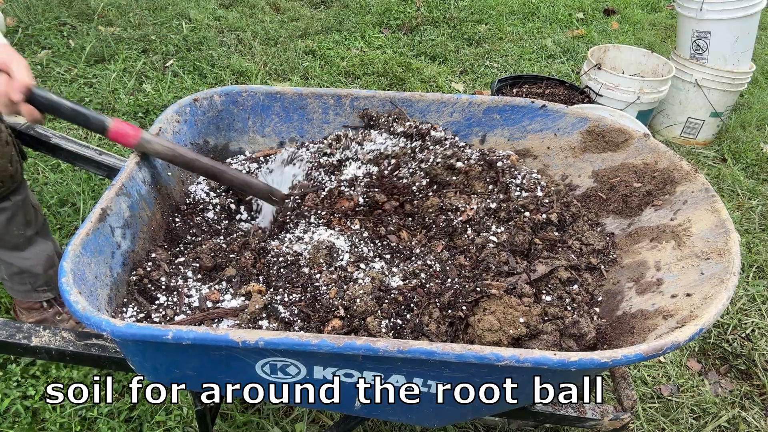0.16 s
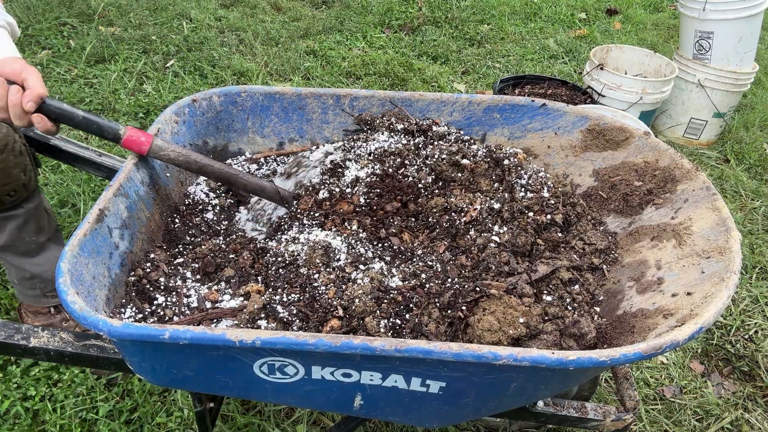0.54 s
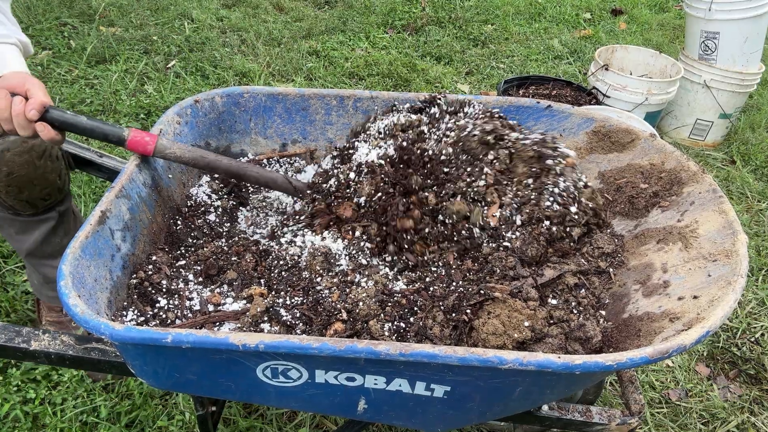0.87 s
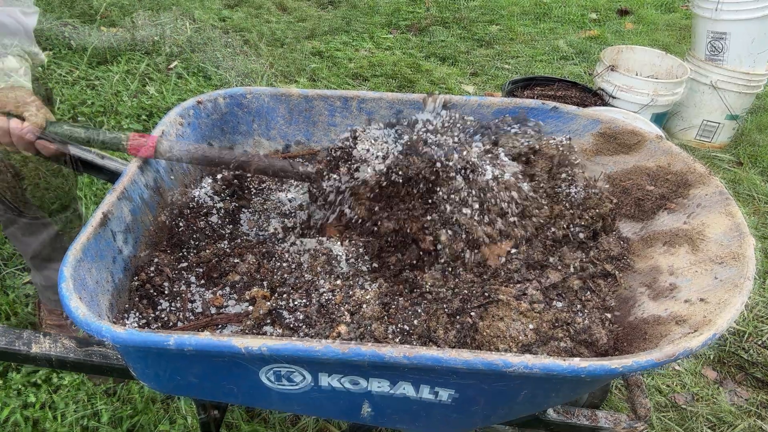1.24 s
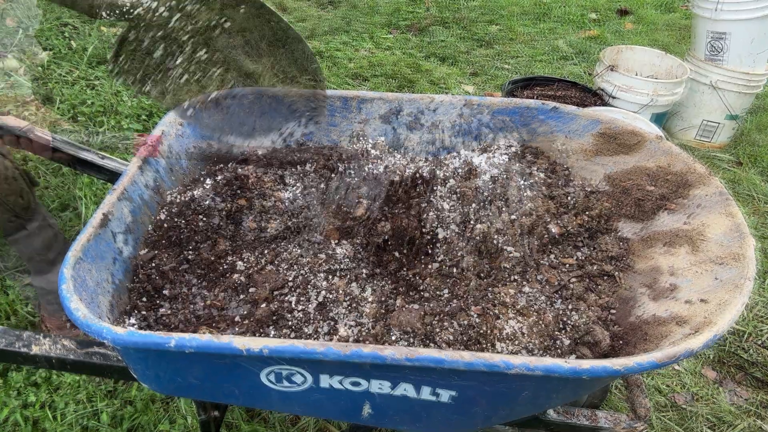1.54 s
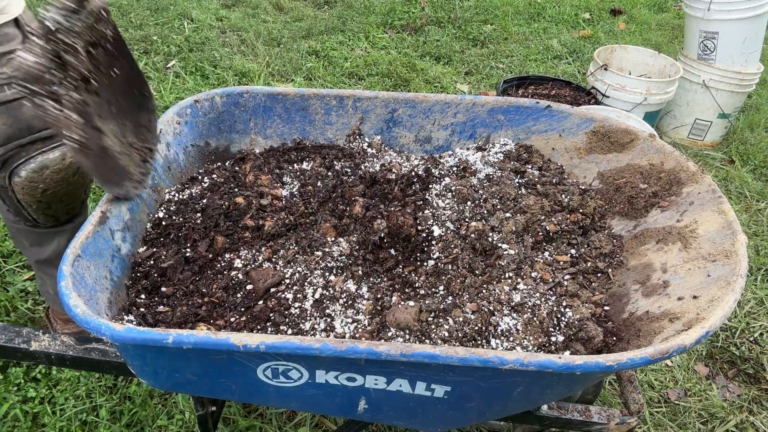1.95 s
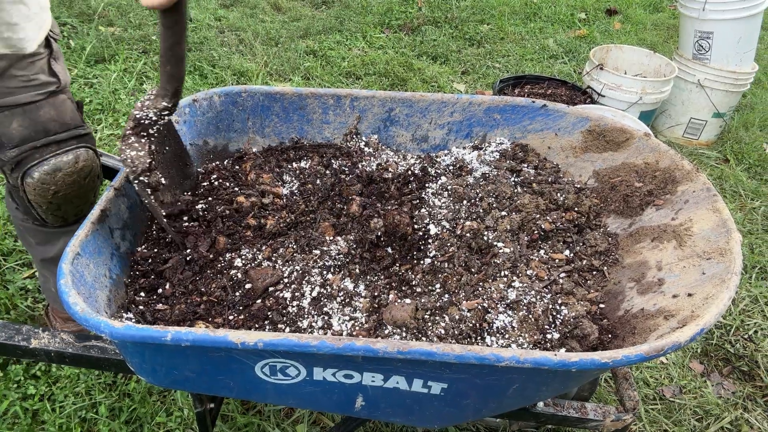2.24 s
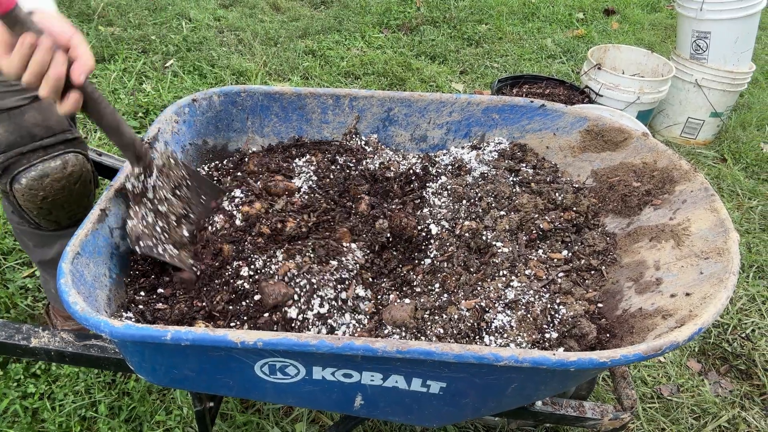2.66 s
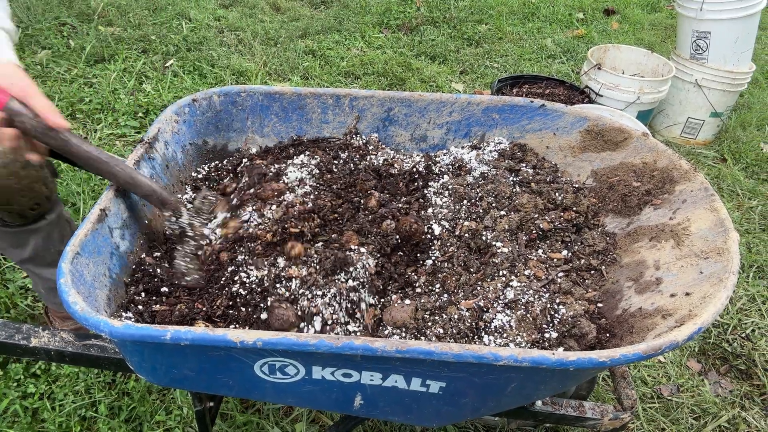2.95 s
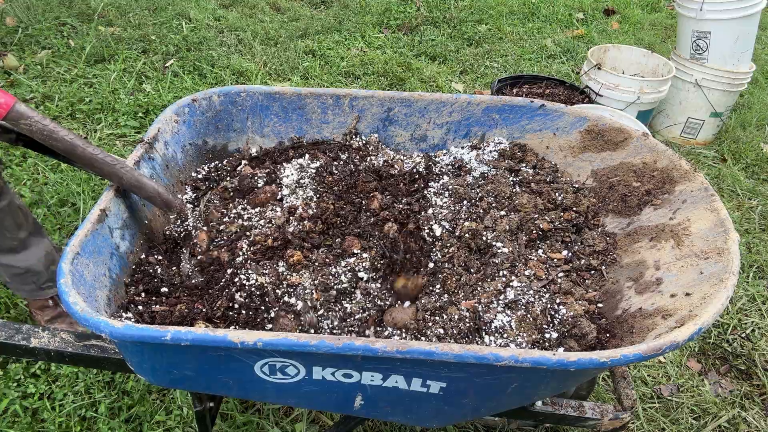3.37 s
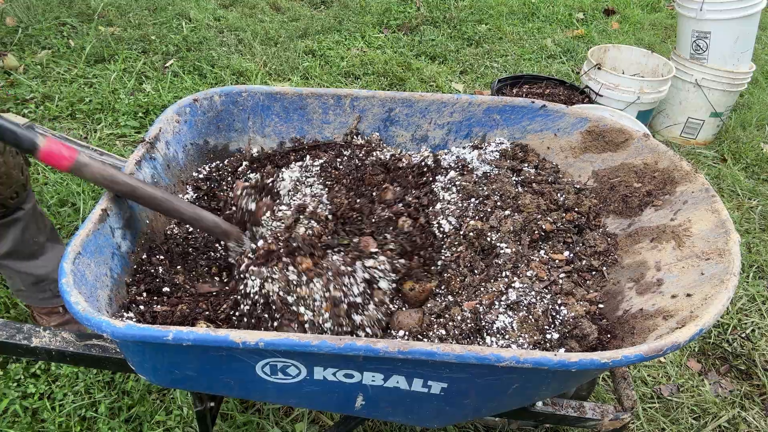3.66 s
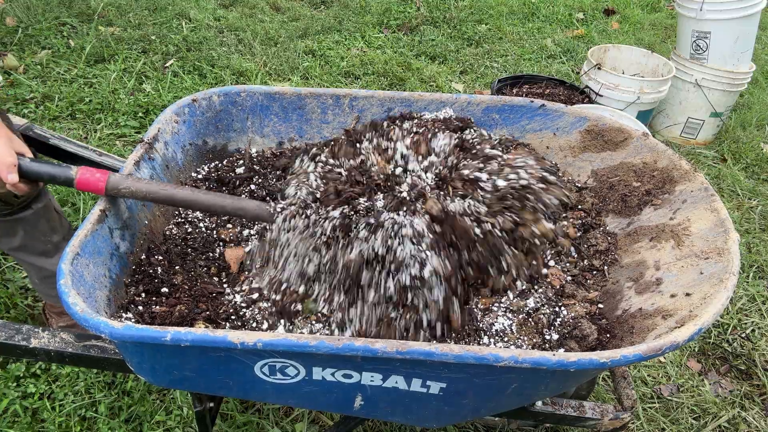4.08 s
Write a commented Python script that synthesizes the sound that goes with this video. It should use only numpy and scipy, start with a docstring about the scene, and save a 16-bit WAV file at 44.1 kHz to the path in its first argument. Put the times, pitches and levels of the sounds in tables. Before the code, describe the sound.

Very close outdoors, a shovel blade grinds loudly through gritty soil with clustered knocks and a low wheelbarrow boom. Loose mix slides and patters softly, then after a near pause a bright metallic clink sounds. Short, quieter scrapes and knocks follow, then a strong burst of stony hits around three and a half seconds, and soil spills again. Faint rumble, air and insects sit behind in stereo.

```python
"""A garden, outdoors: a steel shovel turns a gritty soil mix in a wheelbarrow, close to a two-port microphone.
In short pushes the blade grinds through grit as shaped noisy impacts; the tub booms as decaying low sines.
Lumps knock and hard grains clink as short bursts of cracks that ring the steel.
Lifted soil slides off and patters down as swarms of tiny impacts.
Behind lie a low outdoor rumble, diffuse air and a faint band of insects, all filtered noise."""
import sys
import numpy as np
from scipy import signal
from scipy.fft import rfft, irfft, next_fast_len
from scipy.io import wavfile
from scipy.ndimage import uniform_filter1d, map_coordinates

SR = 44100
rng = np.random.default_rng(int(sys.argv[2]) if len(sys.argv) > 2 else 0)


def store_wav(level_fs):
    """Save 16-bit WAV to argv[1]."""
    pcm = np.round(np.clip(np.atleast_2d(level_fs), -1, 1) * 32767)
    wavfile.write(sys.argv[1], SR, pcm.T.astype(np.int16))


N = 185837

# modes of the soil-damped blade: (frequency [Hz], width [Hz], lift [dB])
BLADE_MODES = [(542, 33, 6.5), (1011, 31, 3.5), (1260, 85, 2), (1470, 19, 1.5), (1670, 22, -1.5),
               (2170, 37, 3.5), (2427, 64, 4.5), (3150, 66, 1.5), (3820, 69, 8.5), (4400, 20, -3),
               (4735, 110, 5.5), (5230, 65, 4.5), (6470, 49, 6.5)]
# colour of coarse scraping and of knocks: (frequency [Hz], relative level [dB])
GRIND_COLOUR = [(60, -27.5), (200, 5.5), (420, 1), (530, -0.5), (650, 0), (900, 0.5), (1250, -0.5),
                (1600, -2), (2100, -5), (2600, -13), (4200, -12.5), (6000, -23.5), (9000, -81)]
# colour of fine grit and of clinks: (frequency [Hz], relative level [dB])
GRIT_COLOUR = [(400, -66), (1800, -6.5), (3100, -3), (3900, -3.7), (4600, 0.5), (6200, 3), (8000, -2),
               (10000, -4.5), (12500, 0), (15500, -6.5)]


def scrape():
    """The blade sticks and slips through the mix; each push drives tub, steel and grit together."""
    # pushes of the blade: (start [s], end [s], tub drone [dB], blade grind [dB], grit [dB],
    # loss of force from start to end [dB], resonance under the blade [Hz])
    strokes = [(0, 0.071, -25, -15.5, -24.5, 3.5, 520), (.085, 0.196, -17, -23, -27, 0, 465),
               (0.196, 0.233, -18.5, -23, -26, 3, 472), (2.088, 2.11, -35, -36.5, -33, -2.5, 1715),
               (2.359, 2.405, -32, -41, -38, 9, 1690), (2.431, 2.494, -39, -29, -28, 0, 1800),
               (2.509, 2.673, -29.5, -31, -32.5, 4.5, 1570), (2.679, 2.79, -27.5, -29.5, -33, -0.5, 2040),
               (2.824, 2.879, -27.5, -27, -28, 2.5, 2060), (2.896, 2.986, -30, -28.5, -37.5, 1.5, 1630),
               (3.484, 3.608, -33, -29.5, -40, -2, 1080), (3.61, 3.738, -33.5, -26, -38, -2.5, 1200),
               (3.762, 3.861, -30.5, -31.5, -39, 3, 1480)]
    # colour of the droning tub: (frequency [Hz], relative level [dB])
    drone_colour = [(60, -31), (110, -19.5), (150, -6), (190, -1.5), (270, -12), (380, -21.5), (600, -29.5),
                    (1500, -74)]
    start, end, drone_db, grind_db, grit_db, loss_db, gap_hz = np.transpose(strokes)
    pushes = np.array([gesture(a, b, rise=0.049, fall=0.04, loss_db=loss)
                       for a, b, loss in zip(start, end, loss_db)])
    # the resonance glides from the middle of one push to the next
    hollow_hz = np.interp(np.arange(N) / SR, (start + end) / 2, gap_hz)
    slip = wobble(130)

    coarse = grains(ring(GRIND_COLOUR, BLADE_MODES), rate=1100, spread_db=2.0, bed_db=-1.5)
    fine = grains(ring(GRIT_COLOUR, BLADE_MODES), rate=1300, spread_db=2, bed_db=-1.0)
    hum = grains(ring(drone_colour), rate=400, spread_db=2.5, bed_db=-6.0)

    drone = strongest(pushes, drone_db) * hum
    coarse = shifting(coarse, patchy_db=2.0, centre_hz=hollow_hz, lift_db=4)
    grind = strongest(pushes, grind_db) * amp(0.52 * slip) * coarse
    flicker = amp(0.59 * slip + 0.9 * wobble(300))
    grit = strongest(pushes, grit_db) * flicker * shifting(fine, patchy_db=1.6)
    return drone + grind + grit


def blows():
    """Single hard contacts of the blade, and the tub's answer."""
    # the blade hits lumps, bark or the tub wall:
    # (time [s], peak ahead of the ports [dB], lump's resonance [Hz], burst's t60 [s])
    knock_rows = [(.003, -2.5, 500, 0.031), (.015, -4.5, 520, 0.13), (.029, -6.5, 616, .035),
                  (.048, -7.5, 456, 0.04), (.071, -10, 458, 0.025), (.13, -11.5, 450, 0.039),
                  (.175, -7.5, 1700, 0.039), (.188, -10.5, 1530, .086), (1.127, -23, 597, 0.041),
                  (1.248, -23.5, 1975, 0.059), (1.963, -15.5, 1450, 0.098), (2.349, -27.5, 695, 0.027),
                  (2.416, -12, 2230, 0.054), (2.458, -15, 1520, 0.12), (2.568, -17.5, 456, 0.056),
                  (2.689, -11, 2060, 0.024), (2.82, -15, 1960, 0.059), (2.891, -15.5, 457, 0.055),
                  (3.08, -14.5, 1450, 0.014), (3.086, -17, 840, 0.058), (3.104, -18.5, 1560, .025),
                  (3.129, -19, 1070, 0.065), (3.451, -10, 1370, 0.022), (3.485, -18, 1050, 0.033),
                  (3.512, -16, 1000, 0.065), (3.556, -5, 1180, 0.045), (3.564, -5.5, 1240, 0.053),
                  (3.589, -10, 850, 0.032), (3.661, 2.5, 890, 0.014), (3.68, -3, 740, 0.045),
                  (3.7045, -3, 1200, 0.04), (3.745, -12.5, 656, 0.07), (3.799, -17, 1560, .03),
                  (3.838, -18, 660, 0.027), (3.967, -27.5, 910, 0.037), (4.156, -18.5, 1630, 0.079)]
    # hard grit cracks against the steel:
    # (time [s], peak ahead of the ports [dB], grain's resonance [Hz], burst's t60 [s])
    clink_rows = [(.041, -3.5, 10400, 0.089), (.094, -11, 14100, .024), (.174, -5, 3300, 0.075),
                  (1.17, -23.5, 13900, .018), (1.246, -20.5, 14200, .023), (1.309, -26, 14000, .015),
                  (1.9615, -4.5, 9000, 0.024), (2.085, -8.5, 5550, 0.0079), (2.124, -25, 14000, .009),
                  (2.415, -10, 4700, .035), (2.457, -10, 12400, .054), (2.689, -15, 4420, .016),
                  (2.829, -14.5, 10690, .06), (3.08, -26, 3550, 0.072), (3.103, -18, 12300, 0.041),
                  (3.129, -17, 6100, 0.019), (3.148, -16.5, 3850, .012), (3.383, -21, 12000, 0.0077),
                  (3.45, -15.5, 11900, 0.019), (3.518, -15.5, 13700, 0.046), (3.539, -10.5, 8950, 0.046),
                  (3.586, -16, 12690, .029), (3.659, -11.5, 3800, 0.034), (3.679, -11.5, 3830, 0.13),
                  (4.129, -19.5, 14400, 0.023), (4.157, -14.5, 4670, 0.015), (4.182, -10.5, 7700, 0.0036)]
    # breadth: width of the resonance as a share of its frequency
    knocks = contacts(knock_rows, GRIND_COLOUR, lift_db=9.5, breadth=0.6, swell_db=-19.5,
                      crumble_db=-34, crumble_t60=0.037, spiky_db=4.5)
    clinks = contacts(clink_rows, GRIT_COLOUR, lift_db=10, breadth=0.4, swell_db=-28.5,
                      crumble_db=-31.5, crumble_t60=0.34, spiky_db=10)
    return knocks + clinks + booms(attack=0.0068)


def contacts(rows, colour, lift_db, breadth, swell_db, crumble_db, crumble_t60, spiky_db):
    """Each blow swells in briefly, bursts and crumbles away; it rings the blade and its own resonance."""
    lead = 1 / 50  # seconds of soft swell before the burst
    track = np.zeros(N)
    t = np.arange(SR // 5) / SR - lead
    for s, db, hz, t60 in rows:
        swell = amp(swell_db - 60 * np.abs(t) / 0.049)
        crumble = amp(crumble_db - 60 * np.abs(t) / crumble_t60)
        burst = amp(-60 * np.abs(t) / max(t60, .002)) + crumble
        uneven = amp(spiky_db * np.clip(rng.standard_normal(len(t)), -2, 2))
        cracks = rng.choice([-1, 1], len(t)) * uneven
        body = ring(colour, [*BLADE_MODES, (hz, breadth * hz, lift_db)])
        hit = signal.fftconvolve(np.where(t < 0, swell, burst) * cracks, body)
        # the blow's strength is set by the peak that it reaches
        add(track, s - lead, amp(db) * hit / np.abs(hit).max())
    return track


def booms(attack):
    """The tub's low modes swell and die; their pitch shifts with where the blade pushes."""
    # shoves that make the tub boom: (time [s], level at the height of the swell [dB], pitch [Hz], t60 [s])
    shoves = [(0.0, -8, 284, 0.074), (.063, -8.5, 215, 0.059), (.077, -8, 215, 0.063),
              (.094, -11, 201.6, 0.17), (.128, -7, 197, 0.12), (.151, -8.5, 186.4, 0.11),
              (0.233, -15, 245, 0.09), (1.964, -9, 173, 0.12), (2.348, -11.5, 167, 0.043),
              (2.422, -18, 160, 0.064), (2.893, -7.5, 177, 0.026), (2.96, -21.5, 174, 0.18),
              (3.085, -16, 171.6, 0.1), (3.451, -10.5, 193, 0.047), (3.534, -13.5, 176, 0.088),
              (3.678, -6, 195, 0.076), (3.817, -16.5, 147, 0.078), (3.844, -11, 151, 0.071)]
    # modes of the loaded tub: (multiple of the pitch [ratio], level [dB], share of the t60 [ratio])
    tub_modes = [(0.761, -14.5, 1.67), (1.003, -0.5, 0.82), (1.42, -10, 0.99), (2.45, -18, 0.78)]
    track = np.zeros(N)
    t = np.arange(SR // 3) / SR
    # soil cushions the shove, so the wall takes a moment to get going
    swell = 1 - np.exp(-(t / attack) ** 2)
    for s, db, hz, t60 in shoves:
        boom = np.zeros(len(t))
        for multiple, level, share in tub_modes:
            decay = amp(level + rng.normal(0, 1.14) - 60 * t / (t60 * share))
            boom += decay * np.sin(2 * np.pi * (hz * multiple * t + rng.random()))
        add(track, s, amp(db) * boom * swell / np.max(swell * amp(-60 * t / t60)))
    return track


def soil():
    """In each fall clods thud on the heap, crumbs patter with them and fine grains hiss off the blade."""
    # falls of loose soil: (start [s], end [s], rise over 20 dB [s], fall over 20 dB [s],
    # clods and crumbs [dB], fine hiss [dB], thinning from start to end [dB])
    pours = [(0.252, 0.283, 0.034, 0.13, -32.5, -45, 4), (.3, .62, .05, .1, -47.5, -47.8, 1),
             (.7, 1.135, .2, .06, -38.5, -43.5, 3), (1.145, 1.445, .04, .008, -35.5, -43, 3),
             (1.478, 1.557, 0.017, 0.089, -70, -50.5, -1.5), (2.286, 2.34, 0.13, .05, -60, -54.5, 8),
             (2.996, 3.14, .05, 0.087, -45, -50, 3), (3.247, 3.387, 0.14, 0.065, -53, -52, -2.5),
             (3.88, 4.075, 0.083, 0.21, -40.5, -43.5, 1.5), (4.15, 4.21, 0.11, .05, -41, -43, 1)]
    # colour of clods: (frequency [Hz], relative level [dB])
    thud_colour = [(50, -6), (110, -0.5), (180, 3.5), (280, -6), (400, -19.5), (1200, -38.5)]
    # colour of crumbs: (frequency [Hz], relative level [dB])
    patter_colour = [(60, -33), (220, -6.5), (420, -2.5), (550, 0.5), (900, -2), (1400, -4), (2000, -8),
                     (2800, -17.5), (6000, -16), (12000, -36)]
    # colour of fine grains: (frequency [Hz], relative level [dB])
    hiss_colour = [(400, -55), (1500, -43), (3000, -3.5), (4500, -0.5), (6200, 0), (8500, 0), (12500, 1),
                   (15500, -1.5)]
    falls = np.array([gesture(start, end, rise, fall, thinning)
                      for start, end, rise, fall, _, _, thinning in pours])
    *_, clod_db, hiss_db, _ = np.transpose(pours)

    thuds = grains(ring(thud_colour), rate=150, spread_db=2.5, bed_db=-6.5)
    crumbs = grains(ring(patter_colour), rate=500, spread_db=1.0, bed_db=1.5)
    patter = amp(-5.5) * shifting(crumbs, patchy_db=1.5)
    hiss = amp(0.23 * wobble(52)) * grains(ring(hiss_colour), rate=2300, spread_db=9, bed_db=9)
    return strongest(falls, clod_db) * (thuds + patter) + strongest(falls, hiss_db) * hiss


def garden():
    """Distant rumble, one wave at both ports but stronger at the right; diffuse air and insects, apart at each."""
    # colour of the distant rumble: (frequency [Hz], relative level [dB])
    rumble_colour = [(20, -34), (35, -11), (50, -1), (70, -2), (92, 4), (120, -3), (170, -15.5),
                     (330, -23.5), (1000, -66), (4000, -90)]
    # colour of the open air: (frequency [Hz], relative level [dB])
    air_colour = [(150, 6), (350, -2.5), (700, 1), (1100, -6), (2200, -16.5), (4400, -25.5), (9000, -27.5),
                  (13000, -16), (15500, -32)]
    # band of the insects: (frequency [Hz], relative level [dB])
    insect_colour = [(3500, -60), (4900, -10), (5600, -0.5), (6300, 3.5), (7100, -1.5), (8500, -29),
                     (11000, -60)]

    def noise(colour, channels):
        """Steady noise of a given colour; rms 1."""
        white = rng.standard_normal((channels, N))
        return unit(filtered(white, lambda hz: amp(along(colour, hz))))

    rumble = amp(-41.0 + 1.4 * wobble(5.66)) * noise(rumble_colour, channels=1) * amp([[-1.5], [1.5]])
    air = amp(-48.5 + 0.204 * wobble(3.4)) * noise(air_colour, channels=2)
    insects = amp(-57.5 + 0.26 * wobble(20)) * noise(insect_colour, channels=2)
    return rumble + air + insects


def ports(x, scatter_t60, scatter_db):
    """The sound reaches the left port first; short scattered copies, unlike at each port, drift in their blend."""
    # phase between the ports: (frequency [Hz], left lead [rad])
    lead_curve = [(200, 0), (690, .5), (1400, .2), (1900, .45), (3000, 1.9), (4300, 2.9), (5800, 4),
                  (8000, 3.4), (10000, 4.5), (13000, 2 * np.pi)]
    # level between the ports: (frequency [Hz], left minus right [dB])
    tilt_curve = [(60, 0.5), (250, -5), (700, -1), (1300, 0), (2400, -3), (4400, -4.5), (8100, 4.5),
                  (14000, -1.5)]
    # colour of the scattered sound: (frequency [Hz], level ahead of scatter_db [dB])
    scatter_curve = [(200, -25), (600, -5.5), (1300, -12.5), (2300, -2.5), (4000, -1), (6000, -4),
                     (8500, -7.5), (13000, -17.5)]
    t = np.arange(SR // 10) / SR
    walls = rng.standard_normal((2, len(t))) * amp(-60 * t / scatter_t60)
    walls = walls / np.linalg.norm(walls[0])
    first, second = signal.fftconvolve(x[None], walls, axes=1)[:, :N]
    turn = 2 * np.array([wobble(12), wobble(12)])
    scattered = np.cos(turn) * first + np.sin(turn) * second

    # each port takes half of the difference
    side = np.array([[1], [-1]]) / 2
    direct = filtered(x, lambda hz: amp(side * along(tilt_curve, hz)) * np.exp(1j * side * along(lead_curve, hz)))
    return direct + filtered(scattered, lambda hz: amp(scatter_db + along(scatter_curve, hz)))


def gesture(start, end, rise, fall, loss_db):
    """Gain of one movement: it builds up, loses loss_db from start to end, dies away; rise and fall span 20 dB."""
    t = np.arange(N) / SR
    outside = np.maximum(start - t, 0) / rise + np.maximum(t - end, 0) / fall
    return amp(-20 * np.minimum(outside, 10) - loss_db * np.interp(t, [start, end], [0, 1]))


def strongest(gestures, levels_db):
    """At each moment the strongest movement sets the gain."""
    return np.max(gestures * amp(levels_db)[:, None], axis=0)


def grains(body, rate, spread_db, bed_db):
    """Random tiny impacts (rate a second) of uneven size on a bed of finer ones, ringing a body; rms 1."""
    size = amp(spread_db * np.minimum(rng.exponential(size=N), 4))
    kicks = (rng.random(N) < rate / SR) * size * rng.choice([-1, 1], N)
    force = unit(kicks) + amp(bed_db) * rng.standard_normal(N)
    return unit(signal.fftconvolve(force, body)[:N])


def shifting(x, patchy_db, centre_hz=None, lift_db=0):
    """Ever new contacts favour other frequencies; a broad resonance may glide through; short-time power stays."""
    hz, t, z = signal.stft(x, SR, nperseg=512)
    patches = uniform_filter1d(rng.standard_normal(z.shape), size=3, axis=0)
    patches = uniform_filter1d(patches, size=4, axis=1)
    db = patchy_db * unit(patches)
    if centre_hz is not None:
        octaves = np.log2((hz[:, None] + 1) / np.interp(t, np.arange(N) / SR, centre_hz))
        db = db + lift_db * np.exp(-(octaves / 0.4) ** 2)
    shaped = z * amp(db)

    def power(v):
        """Power of each frame, averaged over its neighbours."""
        return uniform_filter1d(np.sum(np.abs(v) ** 2, axis=0), size=9) + 1e-12

    levelled = shaped * np.sqrt(np.abs(power(z) / power(shaped)))
    return signal.istft(levelled, SR, nperseg=512)[1][:N]


def ring(colour, modes=(), size=4096):
    """Causal (minimum-phase) impulse response with this colour, lifted at each mode."""
    hz = np.fft.rfftfreq(size, 1 / SR)
    db = along(colour, hz) + sum(lift / (1 + (2 * (hz - f) / width) ** 2) for f, width, lift in modes)
    cepstrum = irfft(np.log(amp(db)))
    # folding the cepstrum onto positive times makes the response causal
    fold = 1 + np.sign(size // 2 - np.arange(size))
    fold[0] = 1
    return irfft(np.exp(rfft(cepstrum * fold)))


def wobble(rate):
    """A smooth random curve, rate knots a second."""
    knots = rng.standard_normal(int(N * rate / SR) + 4)
    return map_coordinates(knots, [np.arange(N) * rate / SR])


def filtered(x, response):
    """x times a complex response of frequency."""
    m = next_fast_len(N + SR // 2)
    return irfft(rfft(x, m) * response(np.fft.rfftfreq(m, 1 / SR)), m)[..., :N]


def add(track, s, sound):
    """Lay a sound into the track at s seconds, trimmed to fit."""
    start = round(s * SR)
    sound, start = sound[max(-start, 0):], max(start, 0)
    track[start:start + len(sound)] += sound[:N - start]


def along(points, hz):
    """Read (frequency, value) points on a log-frequency axis."""
    f, v = np.transpose(points)
    return np.interp(np.log(hz + 1), np.log(f + 1), v)


def amp(db):
    """Decibels to gain."""
    return 10 ** (np.asarray(db) / 20)


def unit(x):
    """Scale to rms 1."""
    return x / np.sqrt(np.mean(x ** 2) + 1e-20)


def scene():
    """Blade and soil each reach the ports with their own scattering; the garden lies behind."""
    blade = ports(scrape() + blows(), scatter_t60=0.03, scatter_db=-0.5)
    falling_soil = ports(soil(), scatter_t60=0.077, scatter_db=1.5)
    return blade + falling_soil + garden()


def record(dry):
    """The recorder reshapes stereo width, drops deep bass, rounds off high peaks and cuts all above its band."""
    # stereo width: (frequency [Hz], gain of the left-right difference [dB])
    width_curve = [(150, 0), (300, 0), (600, 4), (1500, 4.5), (3500, -2), (7000, -2), (12000, 1)]
    side = filtered((dry[0] - dry[1]) / 2, lambda hz: amp(along(width_curve, hz)))
    wide = dry.mean(axis=0) + np.array([side, -side])
    lean = signal.sosfilt(signal.butter(2, 42, "highpass", fs=SR, output="sos"), wide)
    rounded = lean / (1 + np.abs(lean / .95) ** 6) ** (1 / 6)
    return filtered(rounded, lambda hz: hz < 15950)


dry = scene()
out = record(dry)
store_wav(out)
```